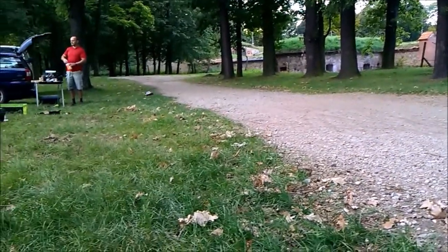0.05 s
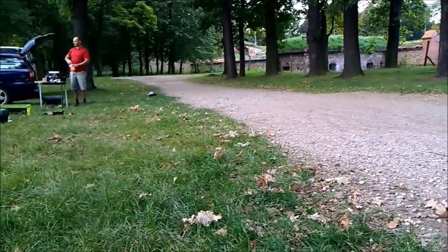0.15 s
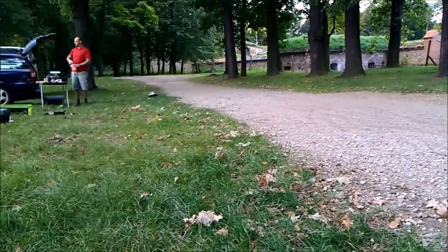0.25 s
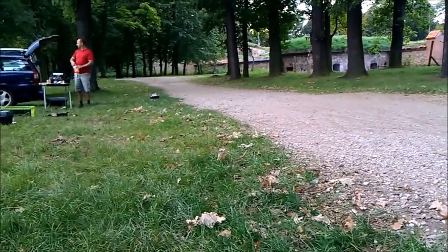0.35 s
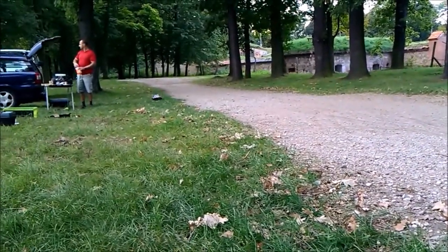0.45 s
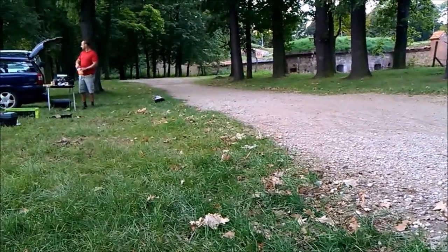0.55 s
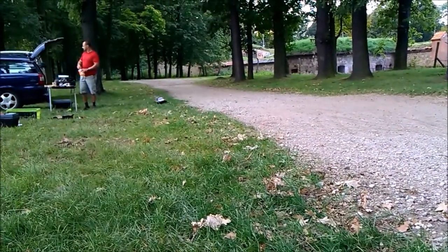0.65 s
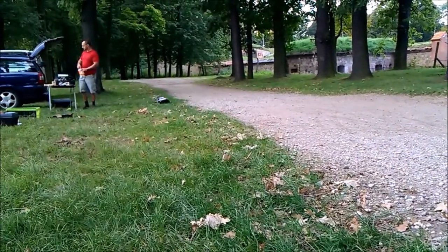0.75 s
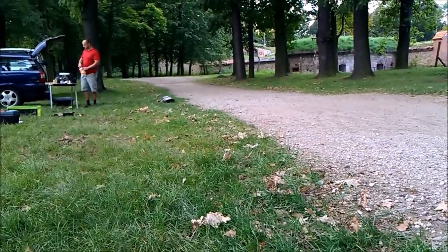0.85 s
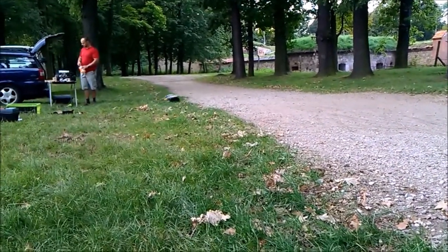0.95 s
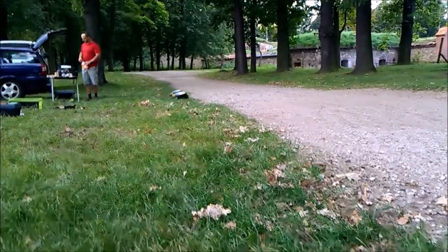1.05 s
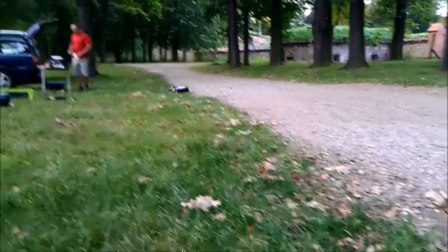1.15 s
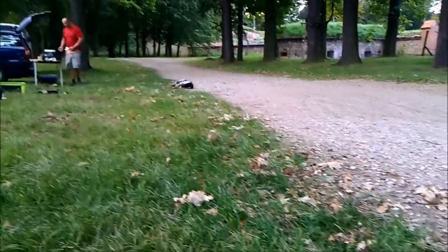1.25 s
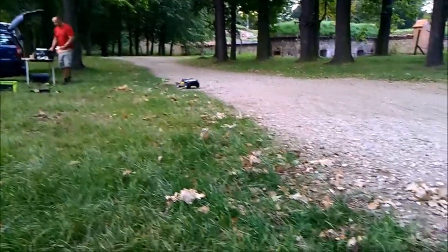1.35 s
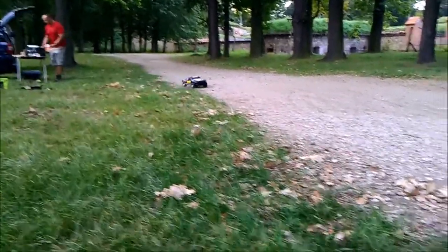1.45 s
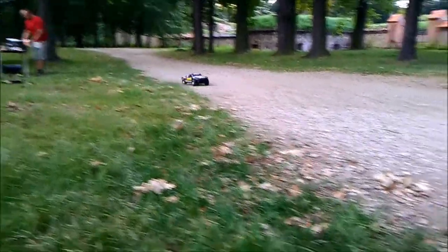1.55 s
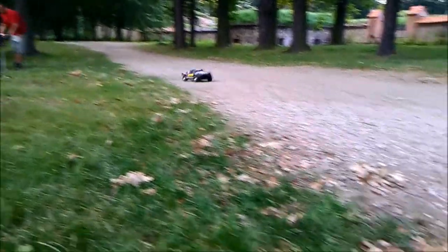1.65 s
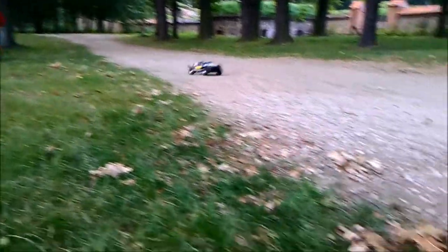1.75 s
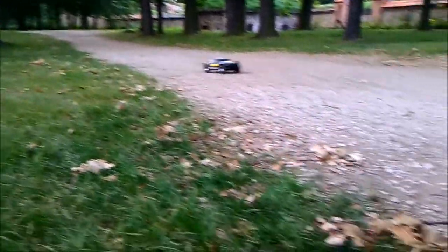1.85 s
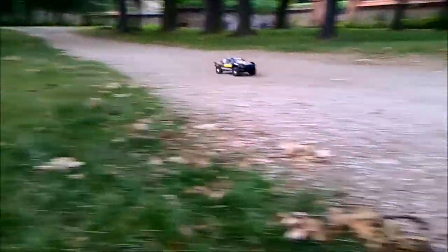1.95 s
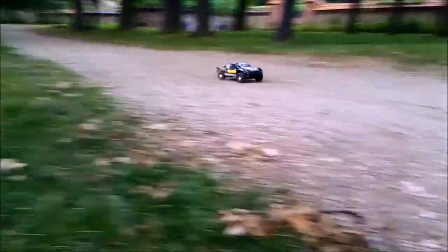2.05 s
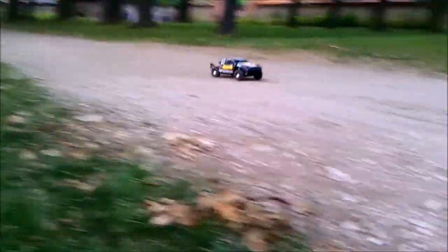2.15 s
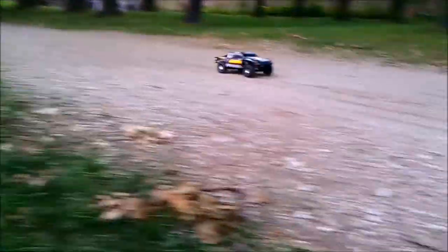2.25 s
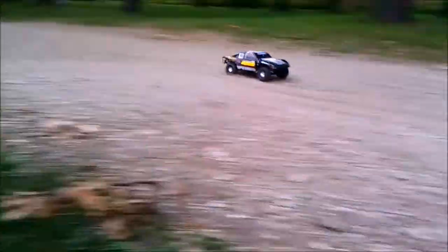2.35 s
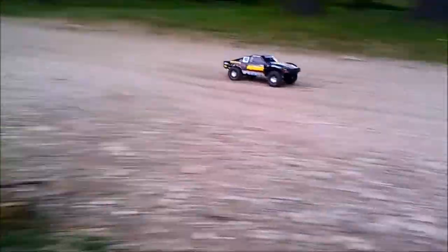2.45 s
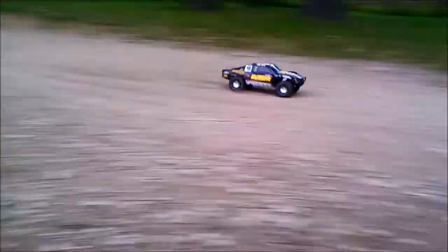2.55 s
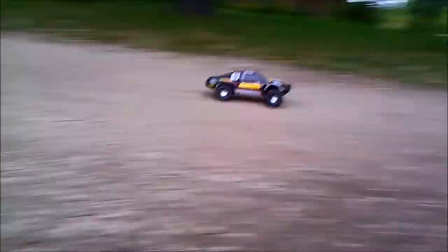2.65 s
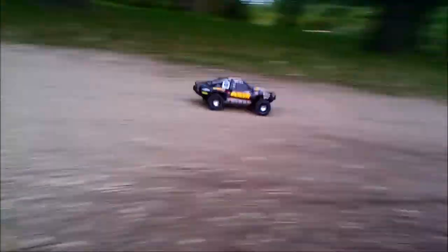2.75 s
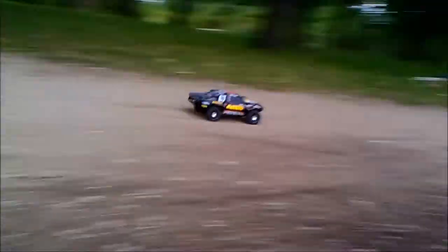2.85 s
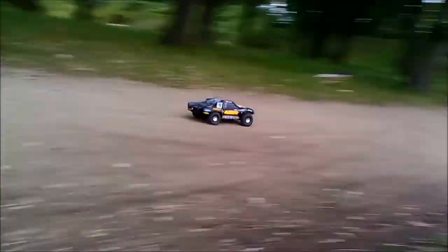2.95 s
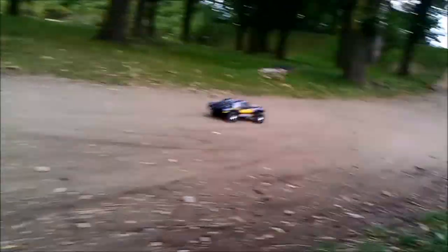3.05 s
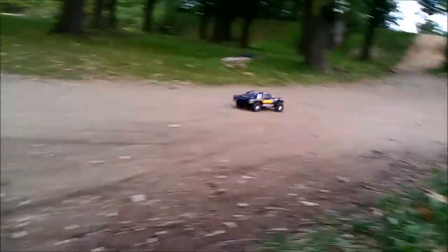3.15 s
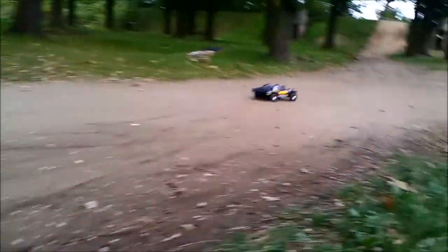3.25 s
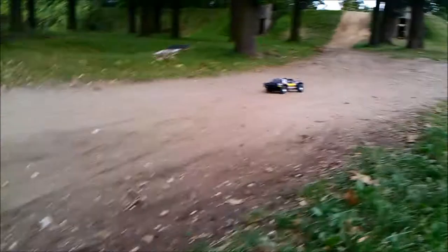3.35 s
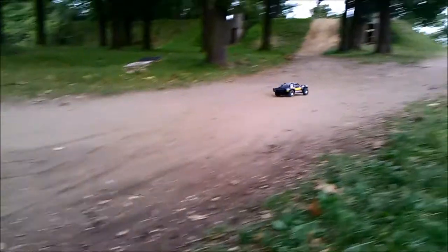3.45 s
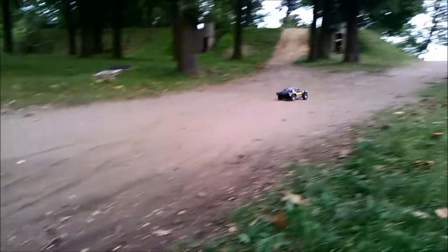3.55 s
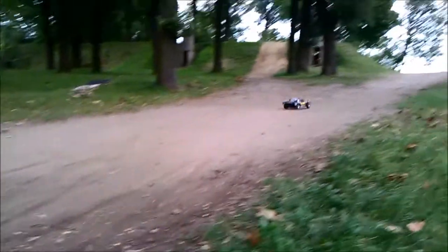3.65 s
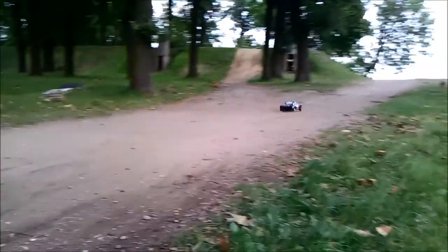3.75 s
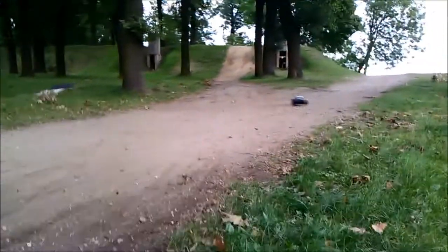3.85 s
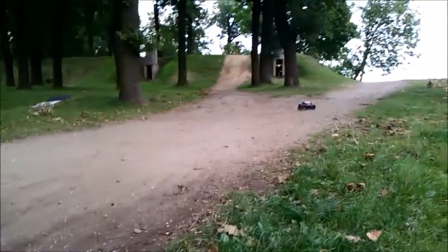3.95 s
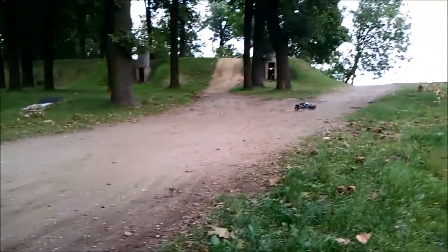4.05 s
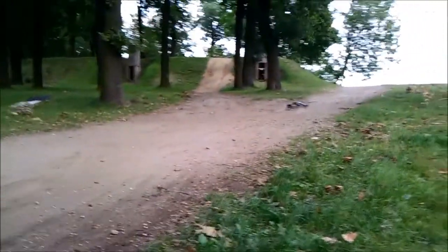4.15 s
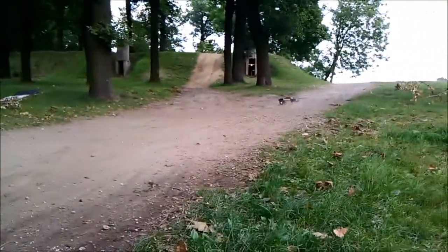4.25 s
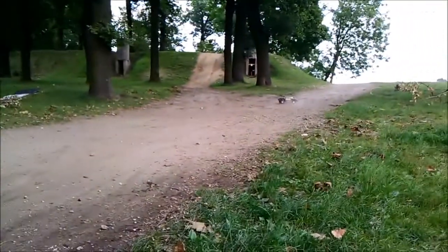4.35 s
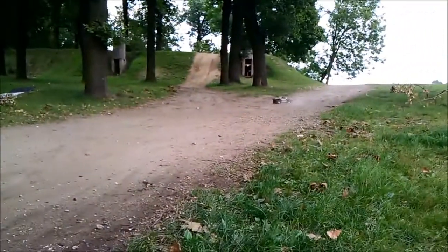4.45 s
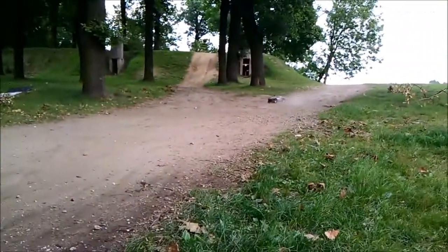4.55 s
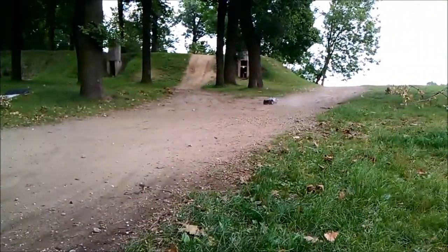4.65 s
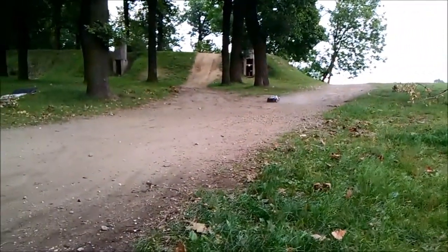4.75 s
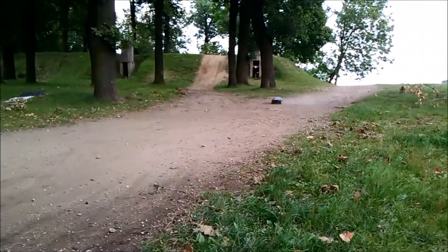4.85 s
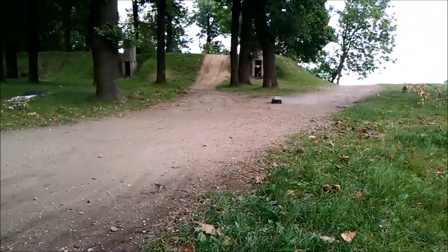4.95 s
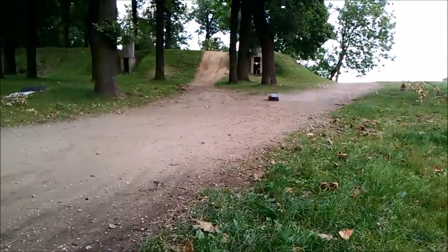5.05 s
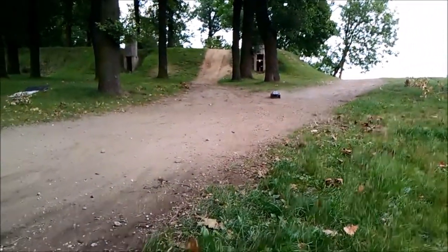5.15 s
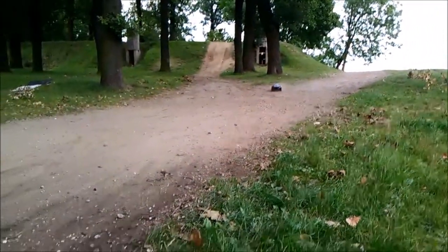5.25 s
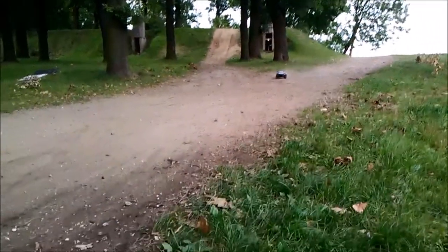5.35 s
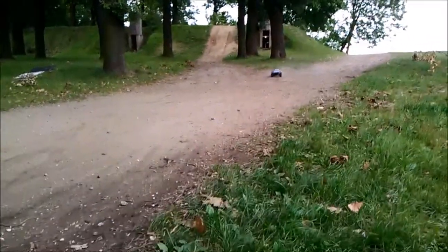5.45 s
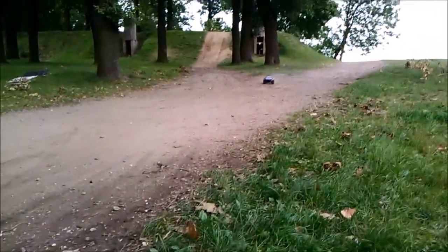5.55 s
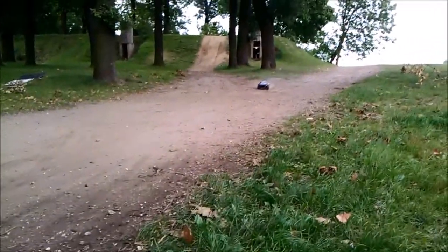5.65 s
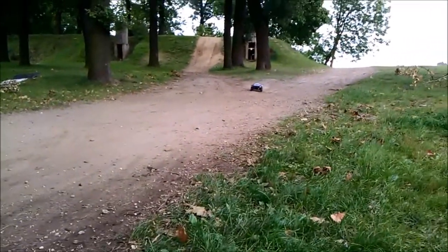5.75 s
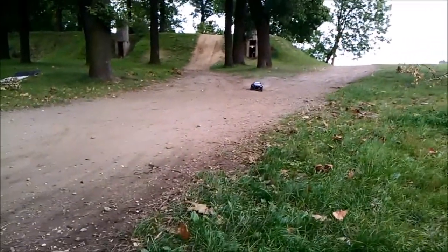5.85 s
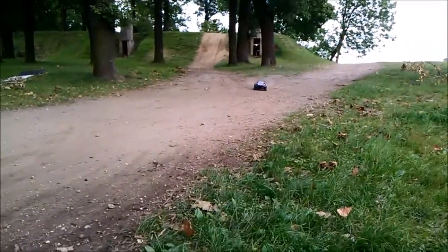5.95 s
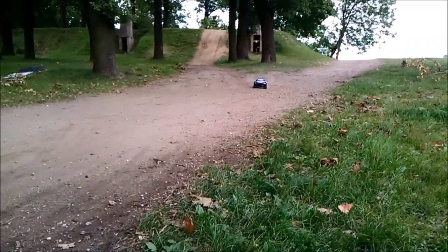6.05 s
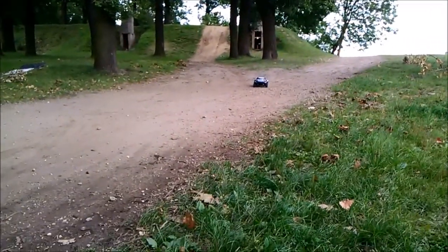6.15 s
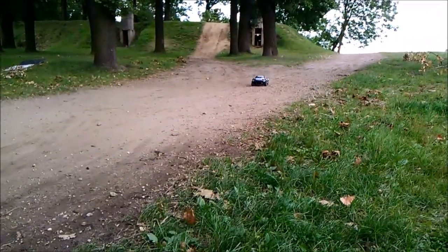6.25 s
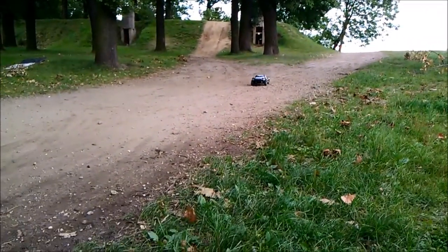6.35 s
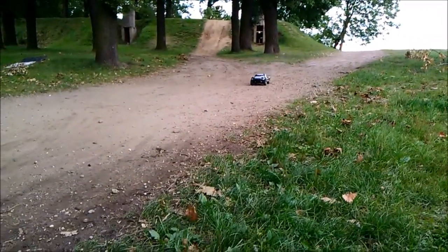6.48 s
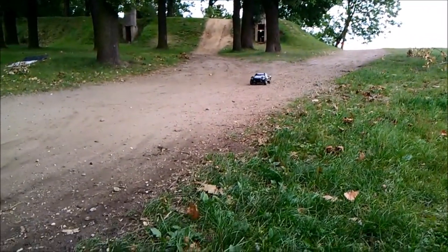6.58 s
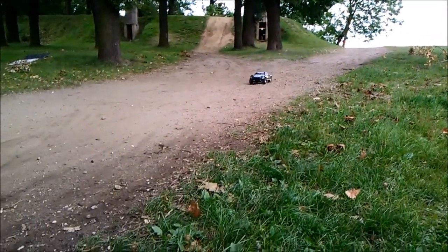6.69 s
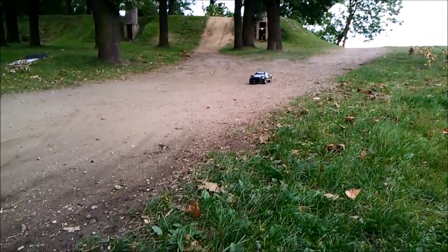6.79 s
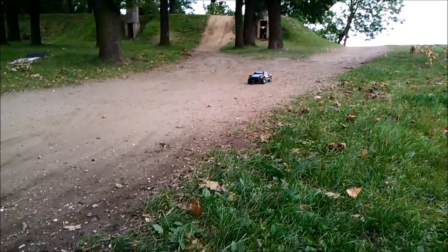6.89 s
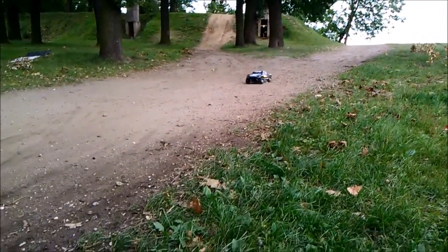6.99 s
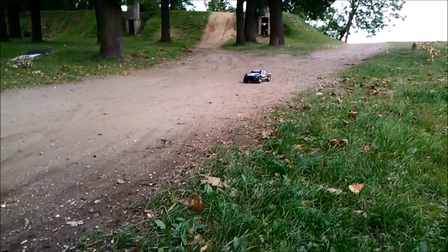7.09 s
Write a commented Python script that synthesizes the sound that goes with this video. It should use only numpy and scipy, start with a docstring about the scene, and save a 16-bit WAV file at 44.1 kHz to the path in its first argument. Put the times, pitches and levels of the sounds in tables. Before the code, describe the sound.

A small electric model truck races along a gravel path, heard in the open air from one fixed microphone. It starts faint and distant, with a thin, high gear whine, a slight low tyre hum and gritty crunching. The whine climbs as it approaches, and a pebble pings sharply at about 1.4 seconds. From 1.7 seconds bumps drum on its hollow plastic shell. The truck is closest between 2.5 and 3.3 seconds, with whine, rattling body and crunching tyres at their fullest. It then recedes, with a soft wind rumble around 3.5 seconds. From 4 to 5 seconds it skids, spraying gravel in a quick run of sharp clicks and clinks. The whine weakens and drops, and a stone snaps dryly at 5.3 seconds. Small wind thumps touch the microphone near 5.7 seconds as the distant motor picks up again. The sound stops at about 6.4 seconds.

```python
"""A small electric model truck races along a gravel park path, 4 m from the microphone at its closest.
It comes in off the verge some 33 m away, passes, skids, turns 20 m out on the far side and heads back.
Bumps drum on its plastic shell, its gear teeth whine and a ballooning tyre hums on the run-up.
The wheels crunch grit and fling stones that knock, ping and snap.
One fixed microphone in the open air, with a little wind bumping its diaphragm."""
import sys
import numpy as np
from scipy import signal
from scipy.fft import rfft, irfft, next_fast_len
from scipy.io import wavfile
from scipy.ndimage import uniform_filter1d

SR = 44100
rng = np.random.default_rng(int(sys.argv[2]) if len(sys.argv) > 2 else 0)


def wrap_up_sound(samples):
    """Save the sound to the file named by the first command line argument, as 16-bit audio."""
    columns = np.atleast_2d(samples).T
    # keep every value between -1 and 1, then stretch to whole-number steps
    tamed = np.clip(columns, -1, 1)
    steps = np.round(tamed * 32767).astype(np.int16)
    wavfile.write(sys.argv[1], SR, steps)


N = 313992

# the truck's place on the path, out and back: time_s, past_microphone_m
PATH = [(0, -33), (.5, -34), (1.5, -16), (2.1, -8.5), (2.5, -3.5), (3.35, 4), (3.85, 14), (4.6, 17),
        (5.4, 20), (6.4, 15)]
# load on the motor, against full throttle: time_s, load_db
MOTOR_LOAD = [(0, -8), (.55, -10), (.95, -0.5), (1.45, -5), (1.9, 1.5), (2.6, -1), (3, -5), (3.3, 0),
              (4.2, -17), (5.2, -16), (5.65, -8), (6.3, -1.5)]
# the tyres lose grip and slide: start_s, length_s, boost_db
SKIDS = [(1.12, 0.082, 1.5), (4.0, 0.37, 4), (4.35, 0.34, 10), (4.68, 0.26, 7), (6.03, 0.08, 2)]
# the chassis drops into ruts: start_s, boost_db
JOLTS = [(1.17, 4.5), (1.69, 7), (1.79, 9.5), (2.11, 5.5), (2.3, 2.5), (2.69, 5.5), (2.84, 4.5), (3.09, 1),
         (4.02, 2), (4.36, 2), (6.15, 2.5)]
# each layer's balance at the microphone:
# closest_db, distance_share, skid_share, jolt_share, load_share, verge_boost_db
THRUM_LEVEL = (-37.5, 0.7746, 0.45, 1.1, 0, .5)
SHELL_LEVEL = (-29, 1.35, 0.7, 0.3, 0, 2)
GEAR_LEVEL = (-28, 0.94, .5, 0, .1, 0.84)
SCRUB_LEVEL = (-31, 1.0041, 0.68, -0.02, 0, -2.5)
CRUNCH_LEVEL = (-31.5, 0.9257, 1.02, -0.04, 0, 1.5)
GRIT_LEVEL = (-36.5, 0.88, 1.1, 0.14, 0.3, 0)

# resonances of the plastic shell and of its side panels: pitch_hz, width_hz, gain_db
SHELL_MODES = [(694, 170, 0)]
PANEL_MODES = [(637, 66, -1), (740, 40.4, 1.5), (991, 80, 1)]
# hard landings boom in the shell: start_s, relative_db
LANDINGS = [(2.49, -16), (2.687, -17), (2.84, -14), (2.855, -15.5), (2.995, -11), (3.103, -15),
            (3.448, -18.5)]
# the gear mesh: time_s, pitch_hz
MESH_PITCH = [(0, 2800), (1, 3180), (1.25, 3400), (1.5, 3280), (1.7, 3670), (2.3, 3850), (2.6, 4090),
              (3.3, 4130), (3.75, 3850), (4.4, 3800), (5.5, 3020), (6.4, 3346)]
# a second, lower gear whine: time_s, pitch_hz, relative_db
LOW_WHINE = [(0, 2950, -20), (1.4, 3036, -7.5), (2.65, 3460, -16), (2.86, 3760, -4), (3.12, 3720, -8),
             (3.27, 3420, -7), (3.6, 3220, -14), (5.4, 3080, -24), (6.2, 3150, -12)]
# the tone an octave under the mesh, and the motor's sizzle: time_s, relative_db
SUBOCTAVE_LEVEL = [(1.3, -35), (1.9, -5), (2.8, -14), (3.3, -3), (3.6, 2), (3.9, -10.5), (5.2, -15),
                   (5.75, -6.5), (6.4, -11.5)]
SIZZLE_LEVEL = [(0, -17), (.9, -12), (1.35, -13), (1.65, -8.5), (2.35, -9), (2.9, -26), (6.4, -22)]
# tones from uneven teeth: shaft_rate_multiple, gain_db
SHAFT_ORDERS = [(9, -11.5), (10, -11), (11, -5.5), (13, -4.5), (14, -3.5), (15, -17), (17, -7.5), (18, -9),
                (19, -11), (21, -3), (23, -5.5)]
# a driven wheel on the run-up: time_s, turns_per_s, level_db
WHEEL = [(0, 32, -60), (.42, 39.4, -50.5), (.8, 39, -52.5), (1.2, 42, -49.5), (1.55, 33, -58),
         (1.8, 36, -52), (2.45, 39.6, -49.5), (2.8, 42, -52), (3, 41, -79)]
# its hum: turn_rate_multiple, gain_db
WHEEL_ORDERS = [(1, -19), (2, 0), (3, -4), (4, -11.5)]

# the loudest hits of stones, and of the chassis on the ground:
# start_s, peak_db, knock_db, ring_db, splinter_db
STONE_HITS = [(.946,-25,-22,0,-22), (1.195,-21,-18,0,-24), (1.505,-19,-20,0,-20), (1.778,-18.5,-6,0,-3),
              (2.239,-19,-3,0,-6), (3.336,-14,-8,0,-9), (4.025,-18,-12,0,-7), (4.1275,-13,-10,-4,0),
              (4.1503,-13.5,0,-20,-34), (4.1585,-16,-4,0,-16), (4.170,-16.5,0,-16,-30), (4.278,-19,-6,0,-4),
              (4.352,-16,-10,0,-13), (4.447,-16,0,-12,-26), (4.483,-17,0,-6,-22), (4.541,-16,0,-6,-22),
              (4.584,-16,0,-8,-22), (4.8525,-15,-8,0,-14), (5.098,-24.5,-4,0,-12), (6.0068,-20.5,-6,0,-3)]
# a ringing pebble: pitch_hz, gain_db, t60_s
PING_MODES = [(5950, -1, .015), (6820, 0, .015), (6400, -3, .005), (3660, -17, .012)]
# gusts at the microphone: middle_s, half_length_s, level_db
GUSTS = [(.5, 1, -57.5), (1.75, 0.2, -50), (3.047, .09, -50), (3.43, .18, -45.5), (3.78, .08, -52),
         (4.2, .3, -58.5), (6.098, 0.3, -58)]
# single eddies on the diaphragm: middle_s, peak_db, middle_to_peak_s
BUFFETS = [(3.525, -32.5, 0.003), (5.624, -34.5, 0.0028), (5.663, -29.5, 0.0014), (5.676, -37, 0.0034),
           (5.707, -29, 0.0012), (5.73, -32, 0.004), (5.867, -35, 0.0015), (5.88, -34, 0.0022),
           (6.173, -39, 0.0036)]

# spectra of the noises: frequency_hz, gain_db
THRUM_COLOUR = [(40, -34.5), (110, -12.5), (200, -6), (300, -0.5), (420, 1), (560, -3), (850, -25.5),
                (1200, -31), (2500, -35.5)]  # shaken chassis
RASP_COLOUR = [(1800, -38), (2650, -18), (3050, -10), (3800, -4), (4400, -8), (5000, -11), (6000, -25.5),
               (9000, -52.5)]  # gear teeth
SIZZLE_COLOUR = [(9000, -33.5), (10300, -11), (10850, -4), (11200, -1.5), (11650, 2.5), (12000, -10.5),
                 (12600, -19), (14000, -43)]  # motor
SCRUB_COLOUR = [(400, -18), (800, -4.5), (1000, -0.5), (1180, -0.5), (1420, 2.5), (1750, -2.5),
                (2100, -0.5), (2400, -6), (2700, -10.5), (3300, -17.5), (5000, -33), (9000, -52.5)]  # tyres on the path
CRUNCH_COLOUR = [(1500, -31), (2700, -15), (3600, -11), (4500, -9), (5100, -5.5), (5900, 0.5), (6900, 2),
                 (7600, -4), (8400, -10), (9300, -14.5), (10500, -14.5), (13000, -18), (16000, -34.5)]  # grinding pebbles
GRIT_COLOUR = [(5000, -32.5), (8000, -8.5), (9300, -17.5), (10300, -10.5), (11500, -20), (13200, -9),
               (14400, -3), (15400, -2.5), (16000, -1), (17500, -42.5)]  # fine thrown grit
KNOCK_COLOUR = [(300, -24), (700, -10), (1100, -9), (1350, 0), (1700, -4), (2100, 0), (2600, -16),
                (4000, -18), (9000, -45)]  # a stone on the shell
SNAP_COLOUR = [(300, -28.5), (1100, 2), (2200, -14.5), (3800, -3.5), (5100, -13.5), (6900, -8),
               (9000, -13.5), (12000, -21), (16000, -27.5)]  # a stone's dry snap
WIND_COLOUR = [(10, -17), (35, -3.5), (80, 0), (150, -2.5), (300, -26), (800, -63)]  # rumble on the microphone

PASS_M = 4.09  # from the microphone to the path
VERGE_UNTIL_S, VERGE_EXIT_S = 1.54, 0.25  # the truck rolls off the lumpy, stony verge onto the packed path
PANEL_DB, PANEL_BEAM = 11, 1.32  # side panels against the shell when side on; how narrowly they radiate
MESH_NOSE_DB, MESH_TAIL_DB, MESH_LOAD_SHARE = -1, -1.5, 1.15  # mesh tone nose on, tail on, and with load
PING_S, PING_PEAK_DB = 1.3888, -8.5
SNAP_S, SNAP_PEAK_DB = 5.3438, -14


def chassis(thrum_db, shell_db, panel_db, bumps):
    """Blows from the ground shake the truck's chassis and drum on its plastic shell."""
    force = unit(amp(1.64 * bumps))

    def blows():
        """Each panel takes its own small blows, harder at every bump."""
        return force * patter(per_s=840, spread_db=2, bed_db=1)

    thrum = amp(thrum_db) * tint(blows(), THRUM_COLOUR)
    panels = unit(sum(amp(db) * ring(blows(), hz, width) for hz, width, db in PANEL_MODES))
    body = unit(sum(amp(db) * ring(blows(), hz, width) for hz, width, db in SHELL_MODES))
    shell = amp(shell_db) * (body + amp(panel_db) * panels) / np.hypot(1, amp(panel_db))
    t = np.arange(2048) / SR
    boom = sum(amp(db) * t * np.exp(-np.pi * 2.5 * width * t) * np.sin(2 * np.pi * hz * t)
               for hz, width, db in PANEL_MODES)
    for start_s, relative_db in LANDINGS:
        add(shell, start_s, at_peak(boom, relative_db - 5.5))
    return thrum + shell


def gears(level_db, load_db, tail_on, bumps, teeth=12):
    """The mesh whines under load; wheel slip smears its pitch and uneven teeth add tones around it."""
    mesh_hz, = curves(MESH_PITCH)
    low_hz, low_db = curves(LOW_WHINE)
    suboctave_db, = curves(SUBOCTAVE_LEVEL)
    sizzle_db, = curves(SIZZLE_LEVEL)
    mesh_db = MESH_NOSE_DB + (MESH_TAIL_DB - MESH_NOSE_DB) * tail_on + MESH_LOAD_SHARE * load_db
    slip = 1 + 0.00825 * wander(hz=30.66) + 0.01109 * wander(hz=262)
    mesh_phase = 2 * np.pi * np.cumsum(mesh_hz * slip) / SR
    low_phase = 2 * np.pi * np.cumsum(low_hz * slip) / SR
    whine = amp(mesh_db) * fluttering_tone(mesh_phase, width_hz=94)
    whine += amp(suboctave_db) * fluttering_tone(mesh_phase / 2, width_hz=76)
    whine += amp(low_db) * fluttering_tone(low_phase, width_hz=47)
    sizzle = amp(sizzle_db + 2 * wander(hz=9)) * tint(rng.standard_normal(N), SIZZLE_COLOUR)
    shaft_tones = unit(sum(amp(db) * fluttering_tone(order / teeth * mesh_phase, width_hz=50)
                           for order, db in SHAFT_ORDERS))
    rasp = tint(patter(per_s=3000, spread_db=6, bed_db=3), RASP_COLOUR)
    shake = unit(amp(0.49 * bumps))
    return amp(level_db) * shake * (amp(-2) * (whine + sizzle) + amp(-6.5) * shaft_tones + amp(-7.5) * rasp)


def tyre():
    """A tyre swollen out of round pushes the air a few times a turn."""
    turns_per_s, level_db = curves(WHEEL)
    phase = 2 * np.pi * np.cumsum(turns_per_s * (1 + 0.014 * wander(hz=12))) / SR
    return sum(amp(level_db + db + 2.1 * wander(hz=8)) * unit(np.sin(order * phase))
               for order, db in WHEEL_ORDERS)


def gravel(scrub_db, crunch_db, grit_db, bumps):
    """Tyres scrub the path, grind pebbles together and throw fine grit, in clumps at each bump."""
    grip = unit(amp(1.3 * bumps + 1.1 * wander(hz=90)))
    scrub = amp(scrub_db) * tint(grip * patter(per_s=1300, spread_db=2, bed_db=4.5), SCRUB_COLOUR)
    pebbles = grip * patter(per_s=1500, spread_db=3, bed_db=6.5)
    grinding = amp(-0.3) * tint(pebbles, CRUNCH_COLOUR)
    clinks = tint(pebble_clinks(grip, per_s=300, spread_db=3.2, t60_s=.026), CRUNCH_COLOUR)
    crunch = amp(crunch_db - 1.03) * (grinding + clinks / 2)
    grains = grip * patter(per_s=1300, spread_db=3.8, bed_db=1.5)
    grit = amp(grit_db + 1.8) * tint(pebbles / 2 + grains, GRIT_COLOUR)
    return scrub + crunch + grit


def pebble_clinks(grip, per_s, spread_db, t60_s, sizes=28):
    """Pebbles of many sizes clink, each at its own pitch."""
    strength = grip * amp(spread_db * np.minimum(rng.exponential(1, N), 4))
    strikes = strength * (rng.random(N) < per_s / SR)
    struck_size = rng.integers(0, sizes, N)
    pitches_hz = np.geomspace(4400, 8200, sizes) * rng.uniform(.99, 1.01, sizes)
    decay = amp(-60 / (t60_s * SR))
    out = np.zeros(N)
    for size, hz in enumerate(pitches_hz):
        resonator = [1, -2 * decay * np.cos(2 * np.pi * hz / SR), decay ** 2]
        out += signal.lfilter([1, -1], resonator, strikes * (struck_size == size))
    return unit(out)


def stones(stray_hits, contact_s=.0008):
    """Flung stones knock the shell, ring and splinter; one pings and one snaps."""
    out, t = np.zeros(N), np.arange(2048) / SR
    knock, clink, splinter = response(KNOCK_COLOUR), response(CRUNCH_COLOUR), response(GRIT_COLOUR)
    contact = np.minimum(t / contact_s, 1)

    def burst(impulse_response, t60_s):
        """A short scrape of grains in one colour."""
        scrape = rng.standard_normal(len(t)) * contact * amp(-60 * t / t60_s)
        return unit(signal.fftconvolve(scrape, impulse_response)[:len(t)])

    for start_s, peak_db, knock_db, ring_db, splinter_db in STONE_HITS + stray_hits:
        hit = amp(knock_db) * burst(knock, t60_s=.02) + amp(ring_db) * burst(clink, t60_s=.028)
        hit += amp(splinter_db) * burst(splinter, t60_s=.013)
        add(out, start_s, at_peak(hit, peak_db))
    ping = contact ** 2 * sum(amp(db - 60 * t / t60_s) * np.cos(2 * np.pi * hz * (t - contact_s))
                              for hz, db, t60_s in PING_MODES)
    add(out, PING_S, at_peak(ping, PING_PEAK_DB))
    # the snap's treble arrives first, its lower notes a millisecond later
    sweep = signal.chirp(t, f0=12000, t1=.001, f1=1500) * (t < .0011)
    add(out, SNAP_S, at_peak(tint(sweep, SNAP_COLOUR), SNAP_PEAK_DB))
    return out


def stray_stones(crunch_db, skid_db, over_crunch_db=12.5, ring_db=0.5, splinter_db=-20):
    """Lesser stones fly up at random, more often in a skid; gives rows like STONE_HITS."""
    per_s = 5 + 2 * skid_db
    starts = np.flatnonzero(rng.random(N) < per_s / SR)
    knock_db = rng.normal(-3, 7, N)
    return [(i / SR, crunch_db[i] + over_crunch_db, knock_db[i], ring_db, splinter_db) for i in starts]


def wind(calm_db=-62):
    """Lumpy low rumble on the microphone, and single eddies that push and pull the diaphragm."""
    t = np.arange(N) / SR
    gusts = sum(amp(db) * np.exp(-((t - middle_s) / half_s) ** 2) for middle_s, half_s, db in GUSTS)
    rumble = unit(tint(rng.standard_normal(N), WIND_COLOUR) * amp(2.5 * wander(hz=14)))
    out = (amp(calm_db) + gusts) * rumble
    for middle_s, peak_db, to_peak_s in BUFFETS:
        offset = np.arange(-4, 4, 1 / (to_peak_s * SR))
        eddy = offset * np.exp((1 - offset ** 2) / 2)
        add(out, middle_s - len(eddy) / (2 * SR), amp(peak_db) * eddy)
    return out


def perspective():
    """The truck from the microphone: dB against its closest point, and how far it is tail on (0-1)."""
    along_m, = curves(PATH)
    distance_m = np.hypot(along_m, PASS_M)
    heading = uniform_filter1d(np.sign(np.gradient(along_m) + 1e-12), size=SR // 2)
    tail_on = (1 + heading * along_m / distance_m) / 2
    return 20 * np.log10(PASS_M / distance_m), tail_on


def path_bumps(hop_hz, drift_hz, hop_share):
    """Uneven ground, plus the wheels hopping on their springs."""
    hop = fluttering_tone(2 * np.pi * hop_hz * np.arange(N) / SR, drift_hz)
    return unit(wander(hz=43.7) + hop_share * hop)


def patter(per_s, spread_db, bed_db):
    """Impacts of very unequal size over a bed of countless tiny ones."""
    starts = np.flatnonzero(rng.random(N) < per_s / SR)
    size = np.minimum(rng.standard_exponential(N)[starts], 4.5)
    sign = np.sign(rng.random(N)[starts] - .5)
    hits = np.zeros(N)
    hits[starts] = sign * amp(spread_db * size)
    return unit(unit(hits) + amp(bed_db) * rng.standard_normal(N))


def fluttering_tone(phase, width_hz):
    """One tone, fluttering in strength and phase."""
    return wander(width_hz) * np.sin(phase) + wander(width_hz) * np.cos(phase)


def wander(hz, step=16):
    """Smooth random drift of rms 1, moving at rates up to about hz."""
    count = next_fast_len(N // step + 2)
    rates_hz = np.fft.rfftfreq(count, step / SR)
    slow = irfft(rfft(rng.standard_normal(count)) / np.sqrt(1 + (rates_hz / hz) ** 4), count)
    return np.interp(np.arange(N), step * np.arange(count), unit(slow))


def swells(rows, attack_s, release_s):
    """Each row rises to its height by start_s, holds and dies away; the highest counts."""
    t = np.arange(N) / SR
    return np.max([height * np.clip((t - start_s) / attack_s + 1, 0, 1)
                   * np.exp(-np.maximum(t - start_s - length_s, 0) / release_s)
                   for start_s, length_s, height in rows], axis=0)


def ring(x, hz, width_hz):
    """Drives a steep resonance, at rms 1."""
    b, a = signal.iirpeak(hz, hz / (width_hz * np.pi / 2), SR)
    return unit(signal.lfilter(b, a, signal.lfilter(b, a, x)))


def response(colour, size=2048):
    """The causal impulse response of a spectrum."""
    hz, db = np.transpose(colour)
    bins_hz = abs(np.fft.fftfreq(size, 1 / SR)) + 1
    log_gain = np.log(amp(np.interp(np.log(bins_hz), np.log(hz), db)))
    return np.fft.ifft(np.exp(np.conj(signal.hilbert(log_gain)))).real


def tint(x, colour):
    """Gives a sound a spectrum, at rms 1."""
    return unit(signal.oaconvolve(x, response(colour))[:len(x)])


def curves(rows):
    """The columns of a time table, one value a sample."""
    times_s, *columns = np.transpose(rows)
    return [np.interp(np.arange(N) / SR, times_s, column) for column in columns]


def add(mix, start_s, sound):
    """Lays a sound into the mix at a time."""
    part = mix[max(round(start_s * SR), 0):][:len(sound)]
    part += sound[:len(part)]


def amp(db):
    """Decibels to gain."""
    return 10 ** (np.asarray(db) / 20)


def unit(x):
    """Scales to rms 1."""
    return x / np.sqrt(np.mean(x ** 2) + 1e-20)


def at_peak(x, peak_db):
    """Scales to a peak level."""
    return amp(peak_db) * x / abs(x).max()


def scene():
    """From beside the path: distance, ground and driving set the levels of chassis, gears and gravel."""
    near_db, tail_on = perspective()
    load_db, = curves(MOTOR_LOAD)
    skid_db = swells(SKIDS, attack_s=.062, release_s=.13)
    jolt_db = swells([(start_s, .026, db) for start_s, db in JOLTS], attack_s=.025, release_s=.038)
    on_verge = np.clip(1 - (np.arange(N) / SR - VERGE_UNTIL_S) / VERGE_EXIT_S, 0, 1)
    layers = THRUM_LEVEL, SHELL_LEVEL, GEAR_LEVEL, SCRUB_LEVEL, CRUNCH_LEVEL, GRIT_LEVEL
    thrum_db, shell_db, gear_db, scrub_db, crunch_db, grit_db = (
        closest_db + near * near_db + skid * skid_db + jolt * jolt_db + load * load_db + verge_db * on_verge
        for closest_db, near, skid, jolt, load, verge_db in layers)
    bumps = path_bumps(hop_hz=27, drift_hz=1.4, hop_share=0.41)
    truck = chassis(thrum_db, shell_db, PANEL_DB + PANEL_BEAM * near_db, bumps)
    truck += gears(gear_db, load_db, tail_on, bumps) + tyre()
    ground = gravel(scrub_db, crunch_db, grit_db, bumps)
    return (truck + ground + wind() + stones(stray_stones(crunch_db, skid_db)))[None]


def record(dry, stop_s=6.416, fade_s=.005, top_hz=15950):
    """The sound stops short, and the top of the treble is cut steeply."""
    running = np.clip((stop_s - np.arange(N) / SR) / fade_s + 1, 0, 1)
    lowpass = signal.firwin(511, top_hz, window=("kaiser", 8), fs=SR)
    return signal.oaconvolve(dry * running, lowpass[None], "same")


dry = scene()
out = record(dry)
wrap_up_sound(out)
```